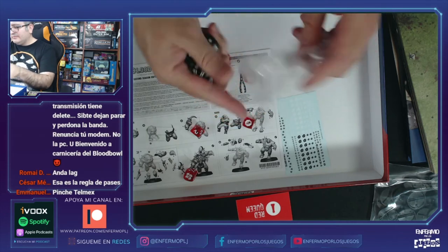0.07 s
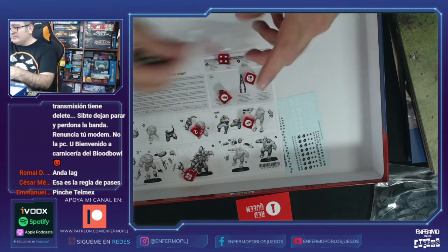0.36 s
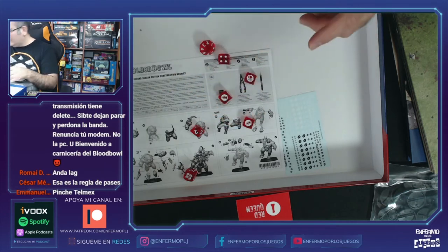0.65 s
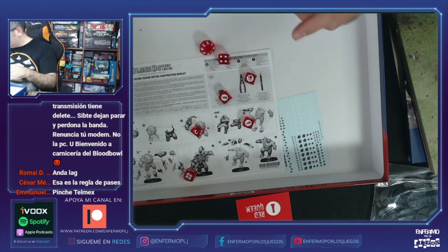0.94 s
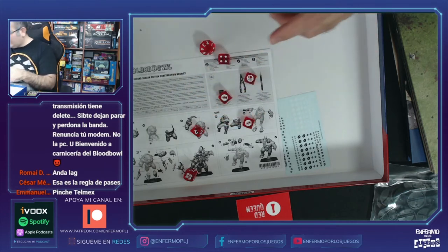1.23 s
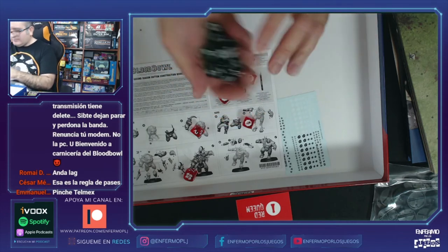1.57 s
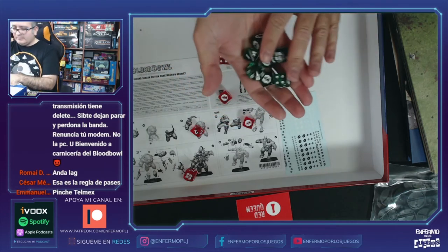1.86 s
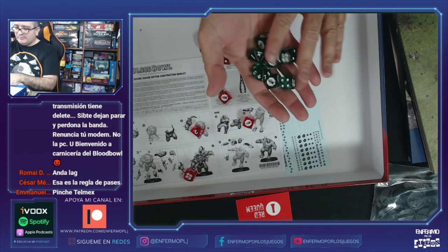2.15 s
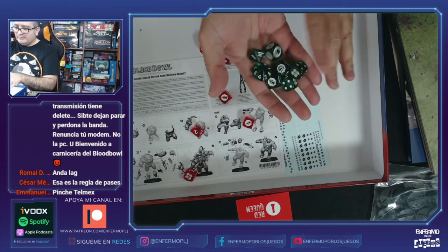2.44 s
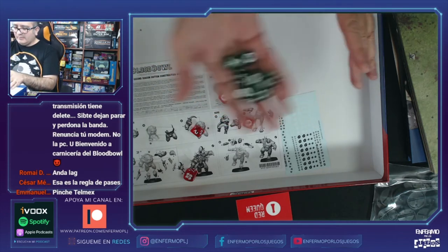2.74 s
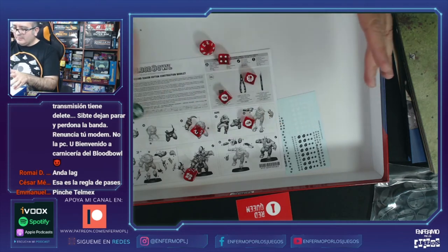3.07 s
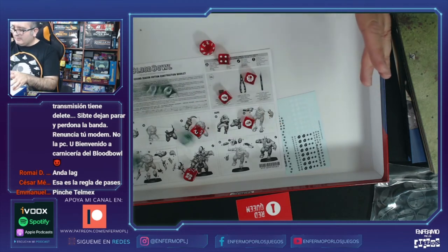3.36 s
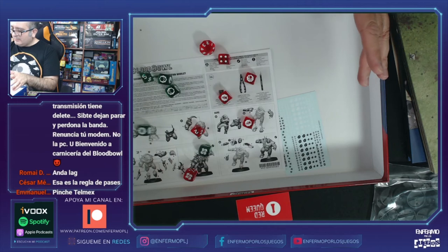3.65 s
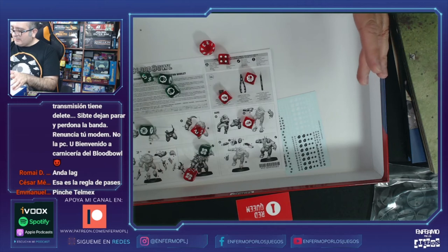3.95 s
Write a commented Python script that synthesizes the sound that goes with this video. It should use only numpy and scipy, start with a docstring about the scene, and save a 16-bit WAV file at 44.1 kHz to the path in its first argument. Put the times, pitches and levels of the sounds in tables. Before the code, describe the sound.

A handful of dice clatters into a shallow cardboard box and tumbles to rest. Before the throw, a thin plastic bag crinkles faintly and the dice click softly in a palm, close to the microphone in a small room.

```python
"""0-1.5 s: a thin plastic bag snaps and crinkles as it is pulled off a handful of dice and put aside.
1.5-3.2 s: the dice click softly in the palm. From 3.2 s: thrown into a shallow cardboard box, they
clack together, knock on its ringing bottom, bump its walls and tumble to rest; one topples at 3.7 s.
Throughout: a small room, one close microphone, a little hiss and rumble."""
import sys
import numpy as np
from scipy import signal
from scipy.fft import rfft, irfft
from scipy.io import wavfile

SR = 44100
rng = np.random.default_rng(int(sys.argv[2]) if len(sys.argv) > 2 else 0)


def transcribe(signal):
    """Save signal, clipped to [-1, 1], as a 16-bit WAV file at the path in sys.argv[1]."""
    frames = np.atleast_2d(signal).T
    limited = np.clip(frames, -1, 1)
    pcm = np.round(limited * 32767).astype(np.int16)
    wavfile.write(sys.argv[1], SR, pcm)


N = 176400
TIME_S = np.arange(N) / SR
HIT_S, CLICK_S = TIME_S[:16384], TIME_S[:4096]


def box():
    """Dice land on the bottom, bump the walls and tumble on in light knocks."""
    # landings: t/s, level/dB, contact cut-off/Hz, panel thump/dB
    landings = [(3.2563, -8.5, 7150, 4.5), (3.2965, -7.5, 4600, 2), (3.2980, -9, 3600, -0.5),
                (3.3031, -22, 6000, 11.5), (3.3313, -7.5, 5600, 2.5), (3.336, -15.5, 6030, 0),
                (3.362, -24, 7000, 5), (3.3689, -19, 4500, 4), (3.3774, -5, 7750, 1),
                (3.381, -11, 6000, -4.5), (3.3995, -21.5, 6400, -18), (3.4413, -6.5, 6800, -12),
                (3.444, -10, 5630, -7.5), (3.4658, -23, 7000, -19), (3.5088, -16, 4330, -4),
                (3.538, -18.5, 5300, -5), (3.563, -24.5, 4000, -10), (3.7244, -28.5, 4100, 7)]
    # wall bumps: t/s, level/dB, f/Hz, t60/s
    bumps = [(3.4131, -15, 853, 0.053), (3.5391, -20, 644, 0.069)]
    # tumbling envelope: t/s, level/dB
    tumble = [(3.30, -62), (3.35, -26), (3.40, -26.5), (3.47, -35), (3.559, -30.5), (3.60, -74),
              (3.69, -58)]
    landing_gain_db, tumbles_per_s = 0.5, 130
    out = np.zeros(N)
    for t_s, db, contact_hz, thump_db in landings:
        add(out, t_s, amp(db + landing_gain_db) * knock(contact_hz, thump_db))
    for t_s, db, hz, t60_s in bumps:
        add(out, t_s, amp(db) * np.sin(2 * np.pi * hz * HIT_S) * decay(t60_s))
    knocks = [knock(contact_hz=3600, thump_db=0) for spot in range(4)]
    times_s, levels_db = np.transpose(tumble)
    for k, t_s in enumerate(np.arange(times_s[0], times_s[-1], 1 / tumbles_per_s)):
        gain = amp(np.interp(t_s, times_s, levels_db))
        add(out, t_s + rng.random() / tumbles_per_s, gain * knocks[k % len(knocks)])
    return cut(out, (66, 15000), "band")


def knock(contact_hz, thump_db):
    """One blow on the bottom: crack, panel modes and dense ring, low-passed by the contact."""
    # bottom panel modes: f/Hz, level/dB, t60/s
    modes = [(172, -29.5, 0.22), (284, -35.5, 0.2), (318, -11.5, 0.032), (339.4, -29.5, 0.2),
             (440, -21.5, 0.065), (626, -17, 0.027), (818, -22.5, 0.047), (1506, -22, 0.03),
             (1870, -23.5, 0.023), (2170, -18, 0.025), (2190, -16, 0.01), (2532, -15, 0.026)]
    # dense ring of the cardboard: f/Hz, relative density/dB
    cardboard = [(100, -4), (300, -3.5), (700, 6), (1300, -4.5), (2400, -8.5), (4000, -16), (7500, -17),
                 (15000, -16)]
    crack_db, ring_db, ring_t60_s = 10.5, 7.5, 0.2241
    thump_below_hz, thump_lag_s = 1200, 0.00027
    spread_db, detune = 3, 0.029  # from spot to spot
    out = amp(crack_db) * (HIT_S == 0)
    for hz, db, t60_s in modes:
        is_thump = hz < thump_below_hz
        age_s = HIT_S - thump_lag_s * is_thump
        gain = amp(db + spread_db * rng.normal() + thump_db * is_thump)
        pitch_hz = hz * (1 + detune * rng.normal())
        out += gain * np.cos(2 * np.pi * pitch_hz * age_s) * decay(t60_s) * (age_s >= 0)
    ring = colour(rng.standard_normal(len(HIT_S)), cardboard) * swell(0.00057, ring_t60_s)
    return cut(out + amp(ring_db) * unit(ring), contact_hz, "low")


def dice_clacks():
    """Dice collide in the throw; the box reflects the clacks."""
    # collisions: t/s, level/dB, f/Hz, Q
    clacks = [(3.1744, -3, 6900, 0.85), (3.1809, -9.5, 6350, 0.86), (3.2787, -1.5, 7000, 1.5),
              (3.2868, -16.5, 6840, 3.6), (3.3413, -13, 7200, 3.2), (3.3492, -7, 8100, 1.4)]
    return dice_clicks(clacks, cutoff_ratio=1.88, echo_db=-12, echo_t60_s=0.033)


def dice_in_palm():
    """Dice touch softly; the hands reflect the clicks."""
    # touches: t/s, level/dB, f/Hz
    touches = [(1.5402, -35, 4900), (1.5647, -36.5, 6860), (1.646, -32.5, 6040), (1.6693, -27.5, 7150),
               (1.74, -24, 7800), (1.776, -31.5, 6500), (2.227, -37, 7300), (2.3882, -26.5, 5430),
               (2.3975, -26.5, 6500), (2.781, -26, 5850), (2.7906, -31.5, 5800), (2.799, -33.5, 6100),
               (2.8267, -35, 5900), (3.1145, -32.5, 4900), (3.1419, -26, 5200), (3.1659, -23.5, 5000)]
    q, gain_db = 0.76, -0.5
    contacts = [(*row, q) for row in touches]
    return amp(gain_db) * dice_clicks(contacts, cutoff_ratio=1.51, echo_db=-0.5, echo_t60_s=0.013)


def dice_clicks(contacts, cutoff_ratio, echo_db, echo_t60_s):
    """Hard die on hard die: bright clicks a few cycles long; a slower contact has a lower cut-off."""
    out = np.zeros(N)
    for t_s, db, hz, q in contacts:
        contact_lowpass = signal.butter(6, cutoff_ratio * hz, fs=SR, output="sos")
        click = signal.sosfilt(contact_lowpass, resonate(CLICK_S == 0, hz, q))
        click /= np.abs(click).max()
        add(out, t_s, amp(db) * near_echoes(click, echo_db, echo_t60_s))
    return cut(out, (740, 17700), "band")


def bag():
    """Each snap of the film sets off a burst of creases; fine crinkling runs below."""
    # snaps and taps: t/s, level/dB, f/Hz, Q
    snaps = [(0.0199, -36, 2950, 2.1), (0.0825, -40, 8600, 0.8), (0.245, -32, 8000, 0.41),
             (0.255, -38, 7000, 0.34), (0.285, -29.5, 6740, 0.61), (0.2977, -30, 1280, 1.2),
             (0.296, -21.5, 6400, 0.46), (.3485, -33, 6600, 0.48), (0.5608, -32.5, 1250, 0.44),
             (0.5693, -29, 7400, 1.3), (0.5702, -34, 1000, 0.35), (0.663, -35, 3270, 0.41),
             (0.795, -45.5, 4500, 0.59), (1.3832, -39.5, 2780, 0.69), (1.3899, -35.5, 6340, 0.75)]
    # crinkle envelope: t/s, level/dB
    crinkle_levels = [(0, -65), (.13, -65.5), (.22, -60), (.275, -52.5), (.36, -57.5), (.45, -64.5),
                      (1.37, -69.5), (1.40, -50), (1.47, -66.5)]
    # crinkle spectrum: f/Hz, relative density/dB
    crinkle_spectrum = [(300, -5), (1500, 1), (4000, -4), (8500, -5), (12000, -11), (16000, -25)]
    snap_gain_db, crease_db, crease_tau_s = 12.5, -14.5, 0.0024
    out = np.zeros(N)
    for t_s, db, hz, q in snaps:
        creases = grains(len(CLICK_S), per_s=2300) * np.exp(-CLICK_S / crease_tau_s)
        snap = unit(resonate((CLICK_S == 0) + amp(crease_db) * creases, hz, q))
        add(out, t_s, amp(db + snap_gain_db) * near_echoes(snap, db=-4.5, t60_s=0.013))
    crinkle = unit(colour(grains(N, per_s=3000), crinkle_spectrum)) * np.sqrt(N)
    crinkle_db = np.interp(TIME_S, *np.transpose(crinkle_levels))
    return cut(out, 11000, "low") + amp(crinkle_db) * crinkle


def near_echoes(x, db, t60_s):
    """Adds reflections off the box or hands, different from every spot."""
    echoes = unit(rng.standard_normal(len(CLICK_S)) * swell(0.0042, t60_s, CLICK_S))
    return x + amp(db) * signal.fftconvolve(x, echoes)[:len(x)]


def room(x, wet_db):
    """Adds a diffuse tail, each band with its own level and decay."""
    # reverberation: f/Hz, level/dB, t60/s
    reverb = [(99, -3.5, 0.33), (344, -5, 0.22), (990, -15, 0.13), (2530, -9.5, 0.12), (4500, -12, 0.11),
              (7950, -7.5, 0.16), (12100, -13.5, 0.16)]
    tail, edges_hz = 0, np.geomspace(70, 17000, 15)
    for low_hz, high_hz in zip(edges_hz, edges_hz[1:]):
        hz = np.sqrt(low_hz * high_hz)
        band = cut(rng.standard_normal(len(HIT_S)), [low_hz, high_hz], "band")
        band *= swell(0.037, at_hz(reverb, hz, column=2))
        tail += amp(at_hz(reverb, hz)) * unit(band) * np.sqrt(2 * (high_hz - low_hz) / SR)
    return x + amp(wet_db) * signal.fftconvolve(x, tail)[:N]


def noise_floor(rms_db):
    """Steady hiss and rumble."""
    # noise spectrum: f/Hz, relative density/dB
    spectrum = [(11, -7), (20, 6), (37, -5), (55, -19.5), (96, -14.5), (220, -17.5), (486, -21.5),
                (2910, -32.5), (14300, -39)]
    return amp(rms_db) * unit(colour(rng.standard_normal(N), spectrum)) * np.sqrt(N)


def amp(db):
    """Decibels to gain."""
    return 10 ** (np.asarray(db) / 20)


def unit(x):
    """Scale to energy 1."""
    return x / np.sqrt(np.sum(x ** 2) + 1e-20)


def at_hz(points, hz, column=1):
    """Interpolate a table column over log frequency."""
    table = np.array(points)
    return np.interp(np.log(np.maximum(hz, 1)), np.log(table[:, 0]), table[:, column])


def colour(x, spectrum):
    """Shape a noise by a spectrum."""
    hz = np.linspace(0, SR / 2, len(x) // 2 + 1)
    return irfft(rfft(x) * amp(at_hz(spectrum, hz)), len(x))


def cut(x, hz, kind):
    """Second-order low-, high- or band-pass."""
    return signal.sosfilt(signal.butter(2, hz, kind, fs=SR, output="sos"), x + 1e-18)


def decay(t60_s, age_s=HIT_S):
    """Exponential decay."""
    return np.exp(-np.minimum(np.log(1000) * age_s / t60_s, 40))


def swell(rise_s, t60_s, age_s=HIT_S):
    """Quick rise, then exponential decay."""
    return (1 - decay(rise_s, age_s)) * decay(t60_s, age_s)


def resonate(x, hz, q):
    """Broad resonance, applied twice for steep flanks."""
    b, a = signal.iirpeak(hz, max(q, hz / (0.4 * SR)), fs=SR)
    return signal.lfilter(b, a, signal.lfilter(b, a, x + 1e-18))


def grains(size, per_s):
    """Random impulses of uneven level."""
    fires = rng.random(size) < per_s / SR
    signs = rng.choice([-1, 1], size)
    levels_db = 6.7 * np.minimum(rng.exponential(1, size), 4)
    return fires * signs * amp(levels_db)


def add(out, t_s, x):
    """Mix x in at t_s."""
    start = int(t_s * SR)
    out[start:start + len(x)] += x[:N - start]


def scene():
    """One microphone on both channels; bag, palm and throw each have their own room tail."""
    floor = noise_floor(rms_db=-52.5)
    palm = dice_in_palm()
    handling = room(bag(), wet_db=3.5) + room(palm, wet_db=3.5)
    throw = room(dice_clacks() + box(), wet_db=-2.5)
    return np.tile(floor + handling + throw, (2, 1))


def record(dry):
    """Soft clipping, then a steep low-pass."""
    ceiling, cutoff_hz = 0.8, 15900
    rounded = ceiling * np.tanh(dry / ceiling)
    return signal.sosfilt(signal.ellip(10, 0.1, 80, cutoff_hz, fs=SR, output="sos"), rounded)


dry = scene()
out = record(dry)
transcribe(out)
```